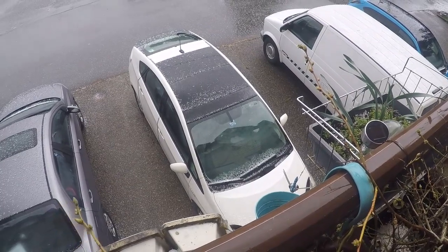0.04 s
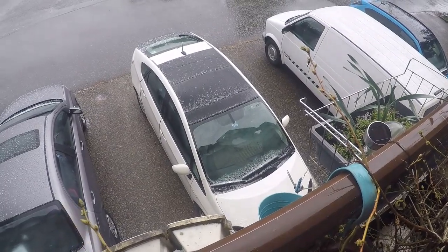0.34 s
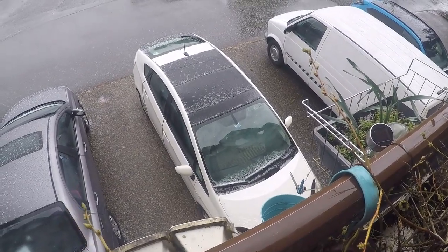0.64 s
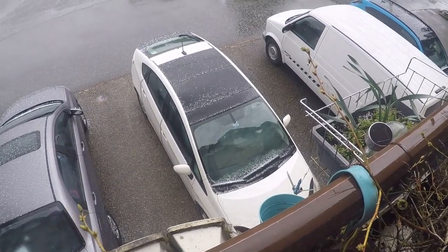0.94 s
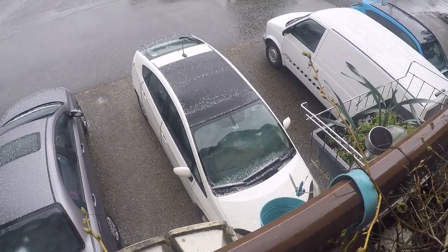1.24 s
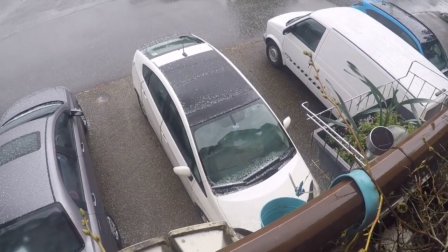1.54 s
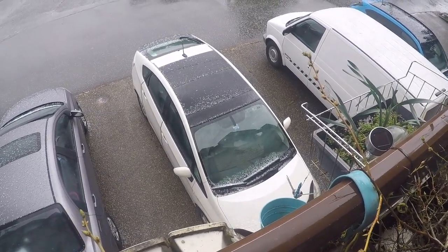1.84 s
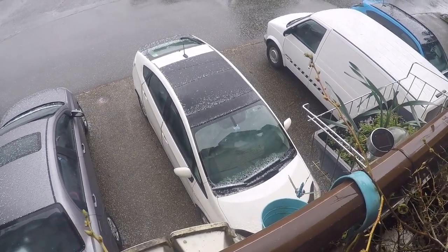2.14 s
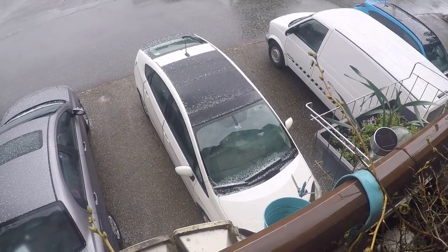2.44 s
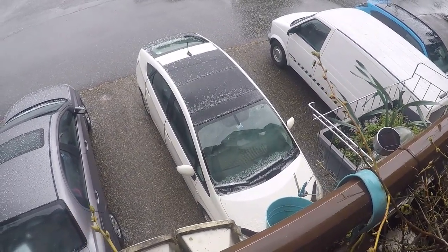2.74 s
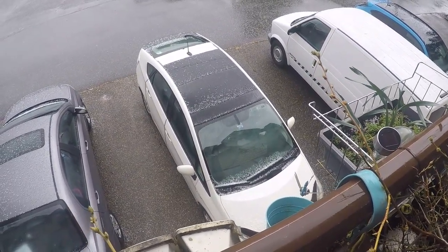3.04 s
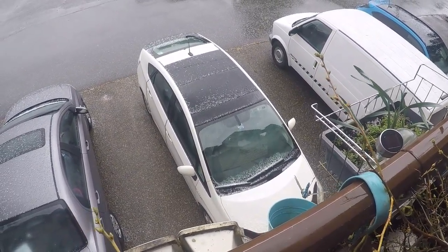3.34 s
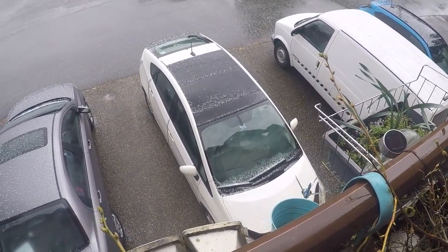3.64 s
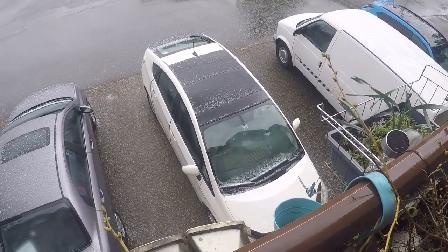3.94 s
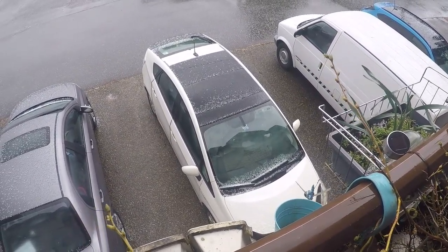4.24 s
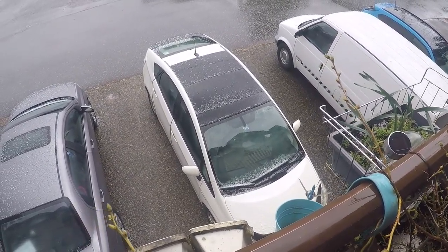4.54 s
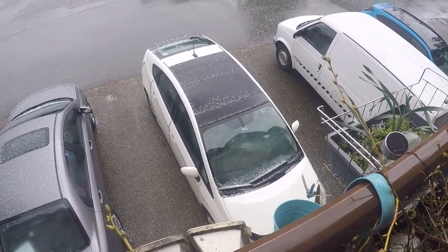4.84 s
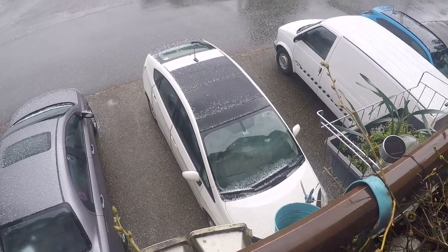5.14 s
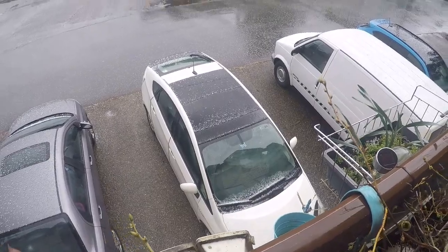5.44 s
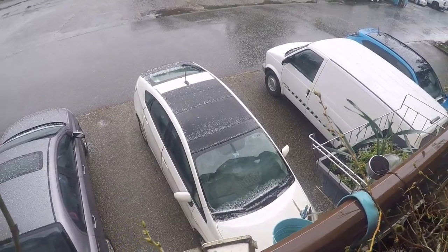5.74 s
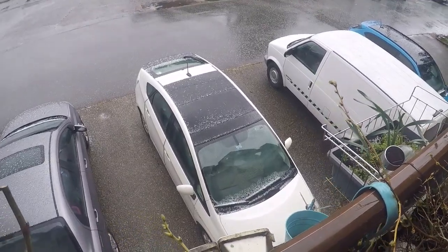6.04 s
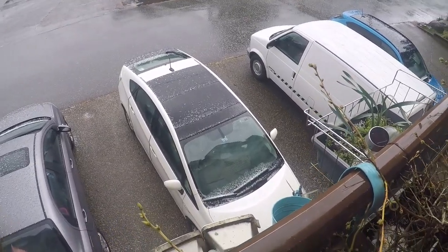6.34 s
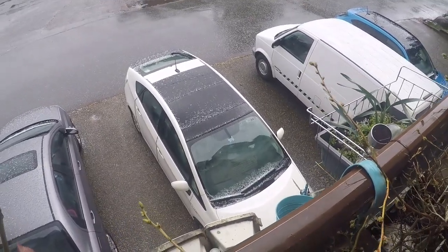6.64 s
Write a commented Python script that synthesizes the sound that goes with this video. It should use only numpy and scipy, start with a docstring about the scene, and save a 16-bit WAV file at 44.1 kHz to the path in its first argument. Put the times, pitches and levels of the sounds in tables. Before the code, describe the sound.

Gusty wind rumbles over a soft hiss of rain and hail, with one sharp crack and several close, thudding drops.

```python
"""A balcony over a street, heard through a camera's closed case. Fine hail and rain on the street and parked
cars merge into a wash, and gusts rumble on the microphone. One stone cracks on the case and rings the plastic;
heavy drops slap and thud on it. Late on, a soft low drone swells, light ticks sound on the case and the grip
shifts, rubbing it with a tick or two. The electronics whine faintly throughout."""
import sys
import numpy as np
from scipy import signal
from scipy.fft import rfft, irfft
from scipy.io import wavfile
from scipy.ndimage import uniform_filter1d

SR = 44100
rng = np.random.default_rng(int(sys.argv[2]) if len(sys.argv) > 2 else 0)


def bounce(signal):
    """Save signal as a 16-bit WAV file at the path given by the first command-line argument."""
    frames = np.transpose(np.atleast_2d(signal))
    limited = np.clip(frames, -1, 1)
    pcm = np.round(limited * 32767).astype(np.int16)
    wavfile.write(sys.argv[1], SR, pcm)


N = 299439


def gain_of(db):
    """Decibels to gain."""
    return 10 ** (np.asarray(db) / 20)


def unit_rms(x):
    """Normalises to rms 1."""
    return x / np.sqrt(np.mean(x ** 2) + 1e-20)


def unit_peak(x):
    """Normalises to peak 1."""
    return x / (abs(x).max() + 1e-20)


def add(mix, at_s, sound):
    """Lays a sound into the mix at the given time."""
    part = mix[max(round(at_s * SR), 0):][:len(sound)]
    part += sound[:len(part)]


def equalise(x, curve):
    """Shapes x with an EQ curve of (f/Hz, level/dB) points and normalises to rms 1."""
    f, db = np.transpose(curve)
    hz = np.fft.rfftfreq(len(x), 1 / SR)
    curve_db = np.interp(np.log(hz + 1), np.log(f + 1), db)
    return unit_rms(irfft(rfft(x) * gain_of(curve_db), len(x)))


def butter(x, hz, kind, order=2):
    """Butterworth filter."""
    return signal.sosfilt(signal.butter(order, hz, kind, fs=SR, output="sos"), x)


def resonate(x, hz, width_hz):
    """Two like resonators in series, normalised to rms 1."""
    radius = np.exp(-np.pi * width_hz / SR)
    pole = radius * np.exp(2j * np.pi * hz / SR)
    for _ in range(2):
        x = 2 * signal.lfilter([1 - radius], [1, -pole], x).real
    return unit_rms(x)


def ring_out(modes, t):
    """A struck object: each mode is a sine dying at its own rate."""
    return sum(gain_of(db - 60 * t / t60) * np.sin(2 * np.pi * hz * t) for hz, db, t60 in modes)


def drift(rate_hz):
    """Smooth random modulation of rms 1."""
    hz = np.fft.rfftfreq(N, 1 / SR)
    return unit_rms(irfft(rfft(rng.standard_normal(N)) * np.exp(-(hz / rate_hz) ** 2), N))


def patter(per_s, spread_db):
    """Random impulses, many small and a few large."""
    size = gain_of(spread_db * np.minimum(rng.exponential(1, N), 5))
    return unit_rms(size * rng.choice([-1, 1], N) * (rng.random(N) < per_s / SR))


def envelope(start_s, hold_s, rise_s, fall_db_per_s):
    """Gain that rises to 1 by the start, holds, then falls at a steady rate."""
    since = np.arange(N) / SR - start_s
    attack = np.exp(-(np.minimum(since, 0) / rise_s) ** 2)
    return attack * gain_of(-fall_db_per_s * np.maximum(since - hold_s, 0))


def whine():
    """The electronics give off thin, steady tones in two tight clusters."""
    # whine tones: f/Hz, rms level/dB
    tones = [(8549, -88), (8603, -82), (8651, -81), (14050, -99), (14099, -92)]
    t = np.arange(N) / SR
    return sum(np.sqrt(2) * gain_of(db) * np.sin(2 * np.pi * (hz * t + rng.random())) for hz, db in tones)


def drone():
    """A soft, narrow band of low noise swells, holds and fades."""
    swell = envelope(start_s=4.45, hold_s=0.66, rise_s=0.15, fall_db_per_s=120)
    return gain_of(-55.5) * swell * unit_rms(butter(rng.standard_normal(N), [125, 160], "band"))


def rain():
    """Countless far impacts merge into a steady wash; nearer ones prickle through it."""
    # the downpour as the case lets it in: f/Hz, level/dB
    wash_eq = [(380, -72), (650, -27), (822, -14.5), (1050, -2), (1230, -1.5), (1460, -5.5), (1580, -3.5),
               (1910, -6), (2300, 1), (2430, -2.5), (2840, -4.5), (3260, 0.5), (3620, -8.5), (3950, -3.5),
               (4500, -24), (5850, -27.5), (9900, -120)]
    # the fizz above it: f/Hz, level/dB
    fizz_eq = [(2530, -16), (4300, -8.5), (4530, -1.5), (5580, -0.5), (7960, -9.5), (8900, -7),
               (9040, -9.5), (14700, -12), (15300, -18)]
    waver = gain_of(0.25 * drift(rate_hz=3))
    wash = equalise(rng.standard_normal(N) + 0.5 * patter(per_s=1500, spread_db=2.5), wash_eq)
    fizz = equalise(rng.standard_normal(N) + 0.3 * patter(per_s=3000, spread_db=2.2), fizz_eq)
    return waver * (gain_of(-52.5) * wash + gain_of(-69.5) * fizz)


def wind_strength():
    """The wind's contour in dB: a wavering breeze with one brief lull, and gusts on top."""
    # gusts that stand out of the breeze: t/s, hold/s, strength/dB
    gusts = [(0.392, 0.058, -29.5), (0.904, 0.06, -37.5), (4.113, 0.19, -38), (4.94, 0.029, -37.5),
             (5.459, 0.13, -25), (5.715, 0.054, -22), (5.81, 0.17, -30), (6.344, .02, -34.5)]
    lull_s, lull_width_s, lull_db = 1.943, 0.048, -8.5
    lull = np.exp(-((np.arange(N) / SR - lull_s) / lull_width_s) ** 2)
    breeze = gain_of(-40.5 + 3.5 * drift(rate_hz=7.7) + lull_db * lull)
    gust_power = sum((gain_of(db) * envelope(at_s, hold_s, rise_s=0.018, fall_db_per_s=93)) ** 2
                     for at_s, hold_s, db in gusts)
    return 10 * np.log10(breeze ** 2 + gust_power)


def buffet(low_hz, high_hz):
    """Eddies in one deep band, of even strength but uneven pace."""
    band = unit_rms(butter(rng.standard_normal(N), [low_hz, high_hz], "band", order=3))
    eddies = signal.hilbert(band)
    power = uniform_filter1d(abs(eddies) ** 2, size=2200)
    return unit_rms(eddies.real / np.sqrt(power + 0.055))


def wind():
    """Gusts buffet the case; hard ones shed faster eddies too, and a lighter draught follows in part."""
    # colour of the draught: f/Hz, level/dB
    draught_eq = [(56, -36), (95, -5), (113, -1), (130, -1.5), (173, -9), (210, -8), (260, -14), (292, -13),
                  (322, -15.5), (575, -26.5), (800, -27), (1040, -65), (1760, -120)]
    strength_db = wind_strength()
    excess_db = strength_db - np.median(strength_db)
    slow = gain_of(strength_db - 2.5) * buffet(low_hz=28.8, high_hz=52.2)
    fast = gain_of(-58.5 + 1.4 * np.minimum(excess_db, 16)) * buffet(low_hz=57.2, high_hz=83.2)
    draught = equalise(rng.standard_normal(N), draught_eq)
    draught_db = -53.92 + 0.23 * excess_db + 0.44 * drift(rate_hz=18)
    return slow + fast + gain_of(draught_db) * draught


def grip():
    """The hand slides over the case: tiny slips excite a rasp and a groan, and the skin hisses."""
    # strokes of the hand: t/s, hold/s, rasp/dB, groan/dB, hiss/dB
    strokes = [(5.84, 0.1, -57, -63.5, -63), (6.015, .11, -56.5, -66.5, -57.5),
               (6.293, 0.065, -59.5, -58.5, -57), (6.526, 0.049, -57, -62, -61)]
    # skin on plastic: f/Hz, level/dB
    skin_eq = [(900, -40), (2000, 3), (3400, 15.5), (4500, 4), (5700, 4), (6600, -10), (14000, -20)]
    slips = patter(per_s=580, spread_db=0.5)
    rasp = resonate(slips, hz=1480, width_hz=340)
    groan = resonate(slips, hz=520, width_hz=65)
    hiss = equalise(rng.standard_normal(N), skin_eq)
    out = np.zeros(N)
    for at_s, hold_s, rasp_db, groan_db, hiss_db in strokes:
        rub = gain_of(rasp_db) * rasp + gain_of(groan_db) * groan + gain_of(hiss_db) * hiss
        out += envelope(at_s, hold_s, rise_s=0.038, fall_db_per_s=172) * rub
    return out


def ticks():
    """Light ticks on the case: each a short pitched burst with a bright click on top. The first three are light
    hits; the last two come as the grip rubs the case."""
    # ticks (light hits, then two from the rubbing grip): t/s, tone peak/dB, centre/Hz, width/Hz, click relative
    # to tone/dB
    hits = [(5.443, -31, 2110, 1510, -12.5), (5.749, -39, 1540, 300, -36), (5.752, -40.5, 2120, 800, -30),
            (6.050, -38, 1480, 300, -32), (6.110, -36.5, 1450, 203, -32)]
    out, t = np.zeros(N), np.arange(3000) / SR
    for at_s, db, hz, width_hz, click_db in hits:
        burst = rng.standard_normal(len(t)) * np.exp(-t * width_hz / 1.4)  # narrow bands ring longer
        tone = unit_peak(butter(burst, [hz - width_hz / 2, hz + width_hz / 2], "band"))
        click = unit_peak(butter(burst, [3000, 9000], "band", order=1))
        add(out, at_s, gain_of(db) * (tone + gain_of(click_db) * click))
    return out


def drops():
    """A heavy drop slaps first; then its weight thumps the body and sets the camera swaying."""
    # heavy drops: t/s, thud/dB, slap/dB, sway send from the thud/dB
    hits = [(1.6669, -19, -28.5, 0), (1.736, -24, -54, -2), (2.0706, -43.5, -62, 8), (2.535, -23, -35, 3.5),
            (3.0558, -25.5, -30.5, 6.5), (3.1215, -38.5, -58, 5.5), (3.9558, -34, -58, 0.5),
            (4.2118, -39.5, -58, -3), (5.4038, -46, -58, -9), (5.7238, -32.5, -61, 7.5)]
    # colour of the slap: f/Hz, level/dB
    slap_eq = [(600, -23), (1200, -4), (1450, 0), (1800, -3), (2300, 7), (2700, -18), (4200, -20),
               (5000, -13.5), (7000, -38), (15000, -63)]
    # modes of the camera's hollow body: f/Hz, level/dB, t60/s
    body_modes = [(198, -9, 0.18), (225.1, -5, 0.36), (314, -0.5, 0.062), (369, 2.5, 0.031),
                  (457, 2, 0.047), (513, -20, 0.27)]
    # the camera swaying in the hand: f/Hz, level/dB, t60/s
    sway_modes = [(44, -10, 0.53), (75, 11, 0.12), (112, -7, 0.27)]
    out, t = np.zeros(N), np.arange(SR // 2) / SR
    preroll_s, sway_trim_db = 0.01, -3
    thud = unit_peak(butter(ring_out(body_modes, t), 559, "low", order=14))
    sway = unit_peak(ring_out(sway_modes, t) * (1 - np.exp(-t / 0.016)))
    since = t - preroll_s
    spike = np.exp(-((since - 0.0014) / 0.00045) ** 2)
    splash = (since > 0) * (spike + 0.49 * np.exp(-since / 0.011))
    for at_s, thud_db, slap_db, send_db in hits:
        slap = unit_peak(equalise(rng.standard_normal(len(t)) * splash, slap_eq))
        add(out, at_s - preroll_s, gain_of(slap_db) * slap)
        add(out, at_s + 0.0011, gain_of(thud_db) * thud)
        add(out, at_s + 0.001, gain_of(thud_db + send_db + sway_trim_db) * sway)
    return out


def hailstone():
    """A stone cracks on the case and rebounds, softer and duller each time; the plastic rings briefly."""
    # the strike and its rebounds: t/s, peak/dB, hardness as low-pass cutoff/Hz
    strikes = [(.1562, -12, 10200), (.1587, -23.5, 3570), (0.1622, -37, 2730)]
    # modes of the plastic case: f/Hz, level/dB, t60/s
    case_modes = [(227, -5, 0.025), (1130, -2.5, 0.011), (1321, -2, 0.021), (1780, -7, 0.036),
                  (2050, -5.5, 0.021), (2300, 3, 0.016), (2440, -4, 0.016), (2793, -7.5, .015),
                  (3583, 2, 0.0089), (3934, -8, 0.016), (4900, -35, 0.015), (6170, -11, 0.0073),
                  (8500, -19, 0.0036)]
    out, t = np.zeros(N), np.arange(3000) / SR
    contact = 1 - np.exp(-t / 0.00097)  # takes a moment to build
    ring = unit_peak(ring_out(case_modes, t) * contact)
    for at_s, db, cutoff_hz in strikes:
        crack = unit_peak(butter(rng.standard_normal(len(t)), 1000, "high") * np.exp(-t / 0.00083))
        blow = butter(ring + 0.087 * crack, cutoff_hz, "low", order=4)
        add(out, at_s, gain_of(db) * unit_peak(blow))
    return out


def scene():
    """The weather bed, hits on the case, handling and whine, mixed in mono."""
    return (rain() + wind() + drone() + hailstone() + ticks() + drops() + grip() + whine())[None]


def record(dry):
    """The camera's band limit: a steep low-pass takes off the very top."""
    lowpass = signal.firwin(511, cutoff=15350, window=("kaiser", 9), fs=SR)
    return signal.oaconvolve(dry, lowpass[None], "same")


dry = scene()
out = record(dry)
bounce(out)
```